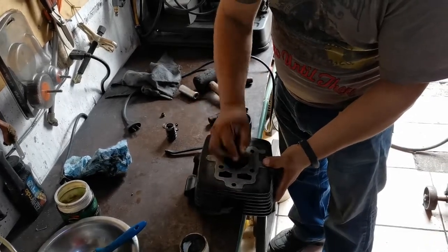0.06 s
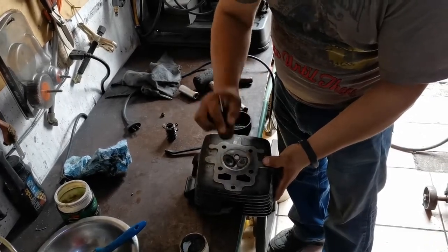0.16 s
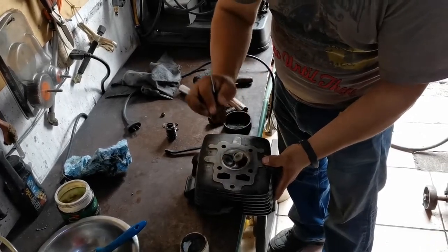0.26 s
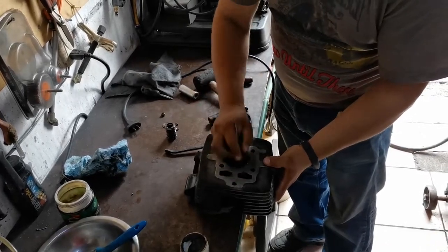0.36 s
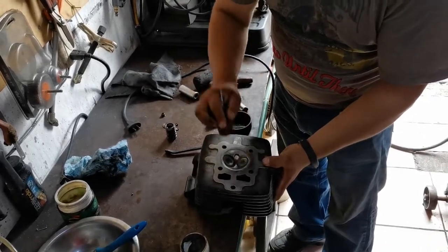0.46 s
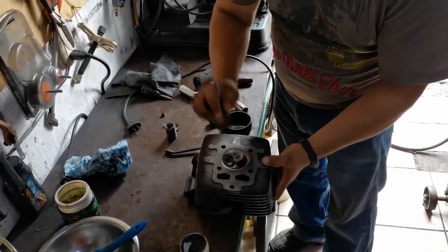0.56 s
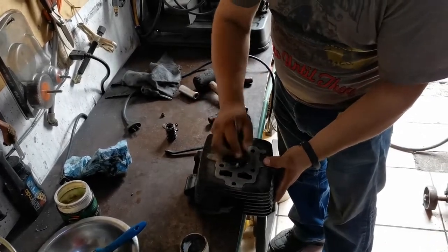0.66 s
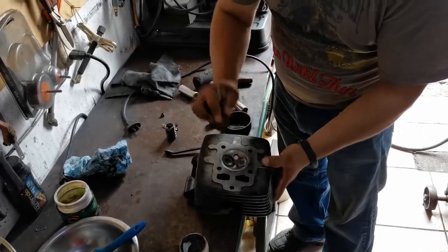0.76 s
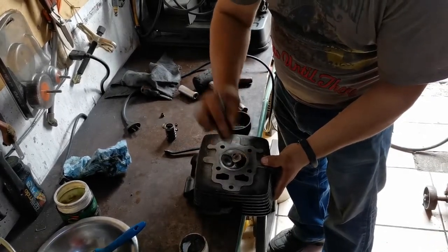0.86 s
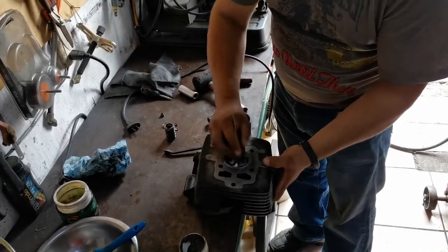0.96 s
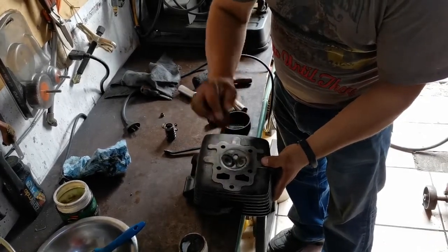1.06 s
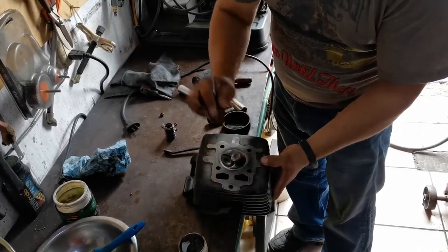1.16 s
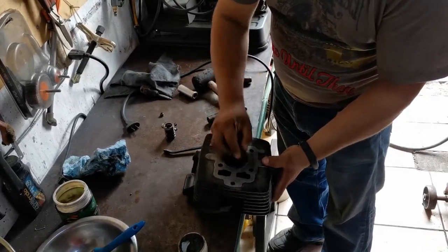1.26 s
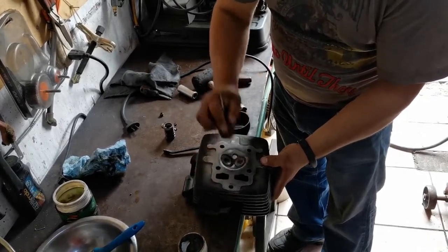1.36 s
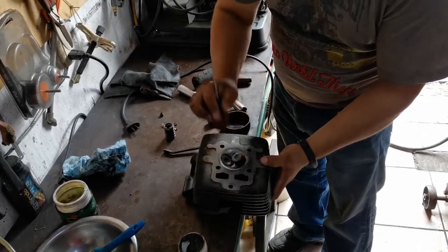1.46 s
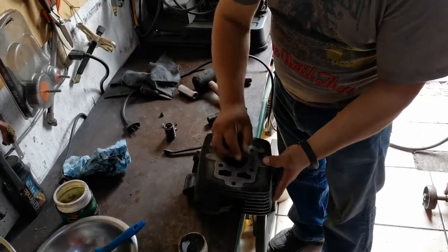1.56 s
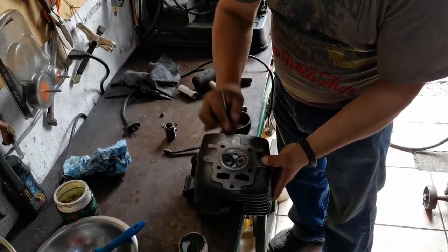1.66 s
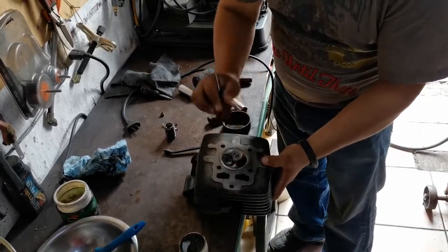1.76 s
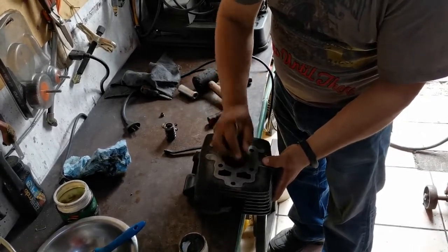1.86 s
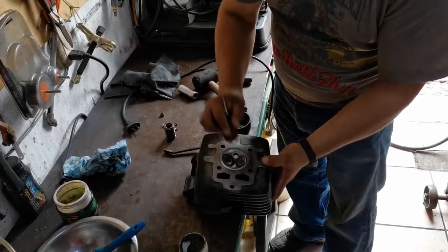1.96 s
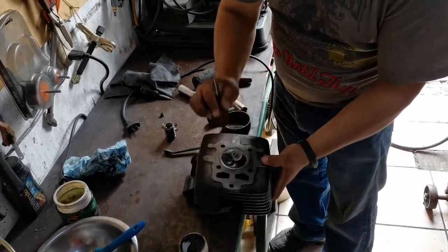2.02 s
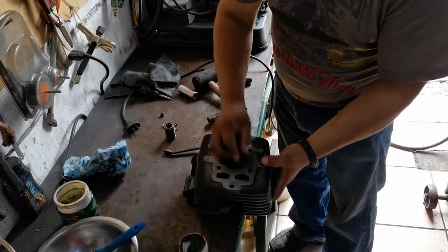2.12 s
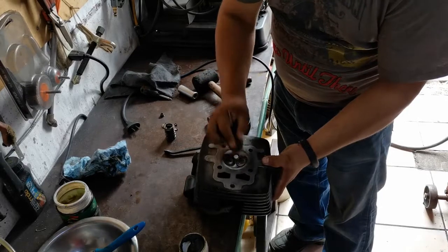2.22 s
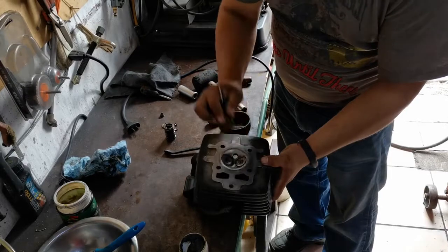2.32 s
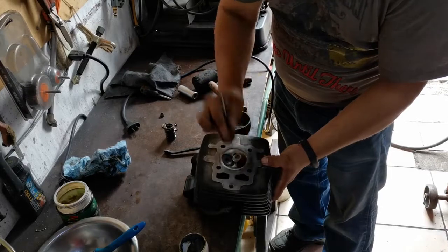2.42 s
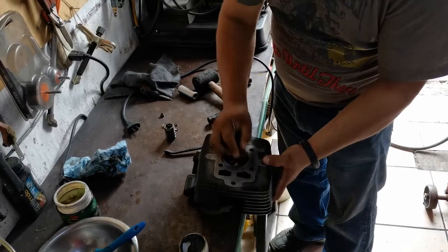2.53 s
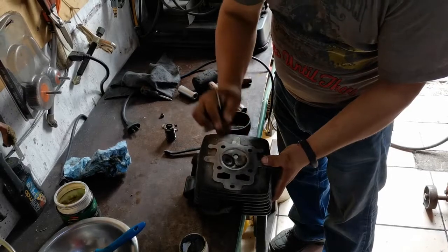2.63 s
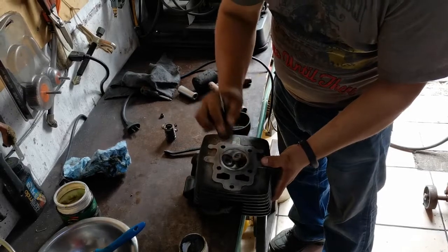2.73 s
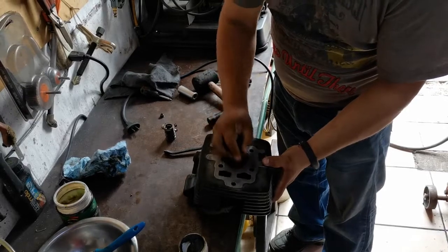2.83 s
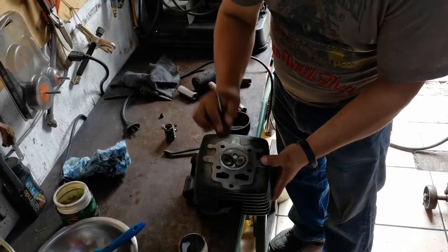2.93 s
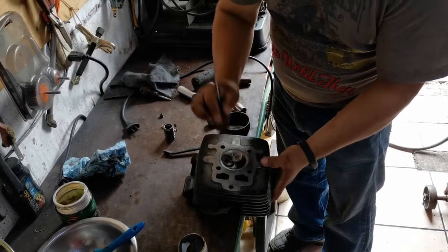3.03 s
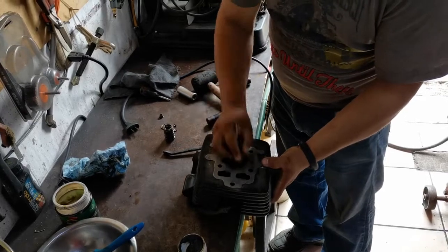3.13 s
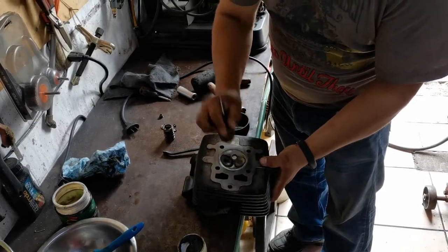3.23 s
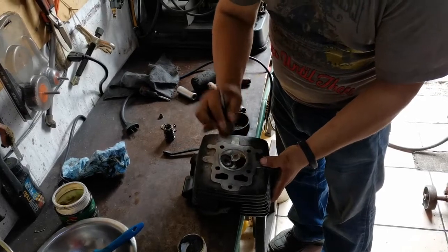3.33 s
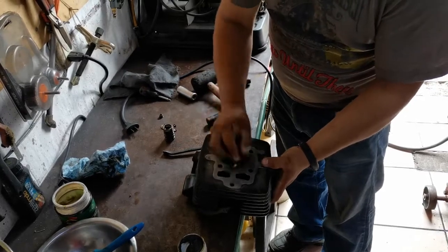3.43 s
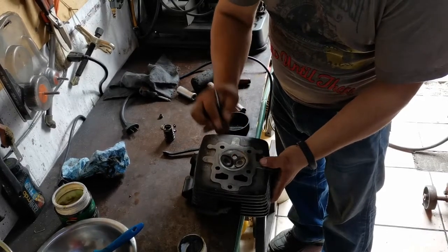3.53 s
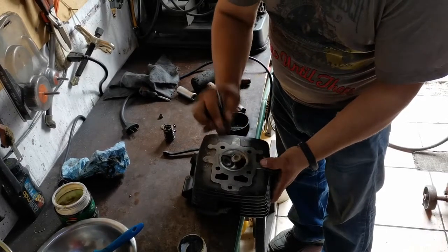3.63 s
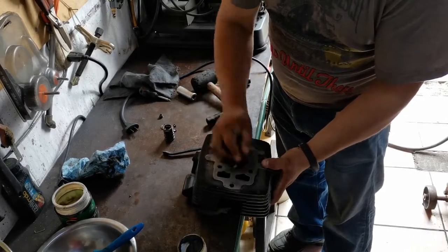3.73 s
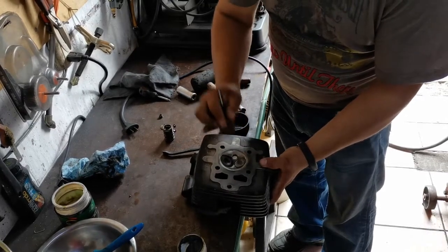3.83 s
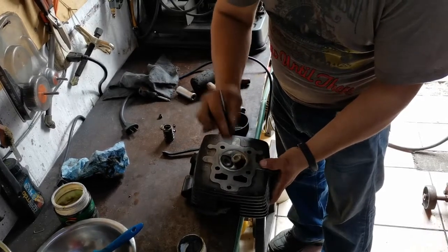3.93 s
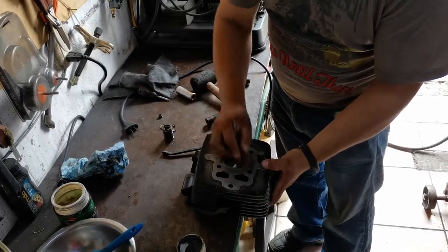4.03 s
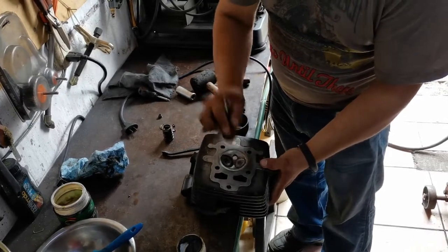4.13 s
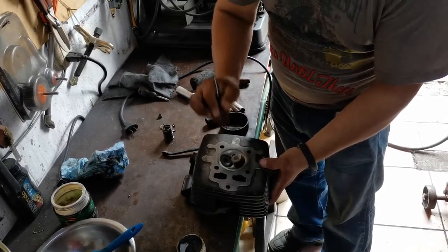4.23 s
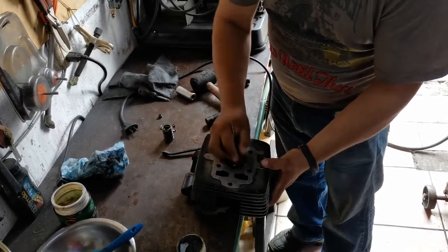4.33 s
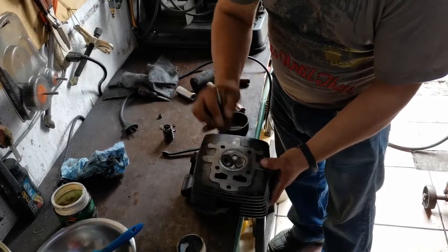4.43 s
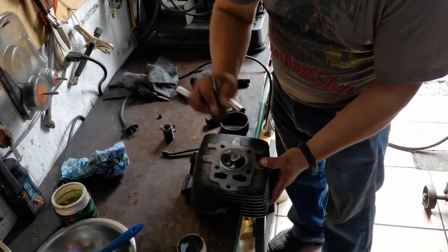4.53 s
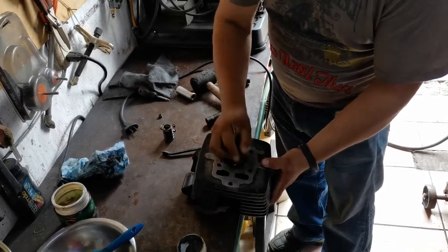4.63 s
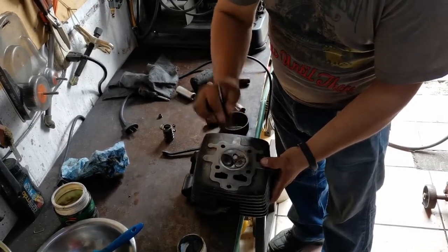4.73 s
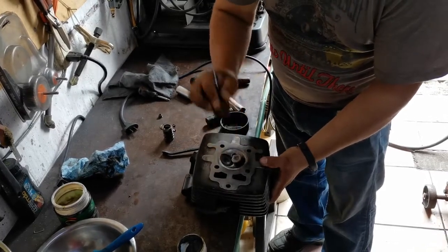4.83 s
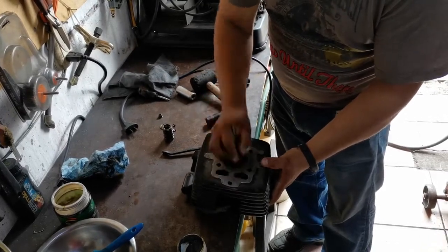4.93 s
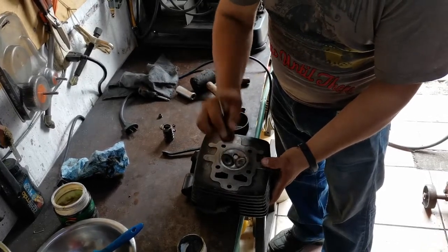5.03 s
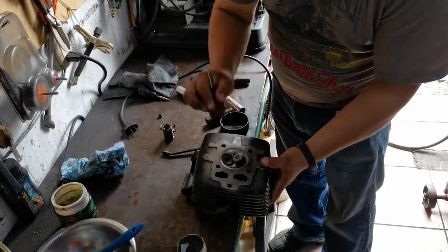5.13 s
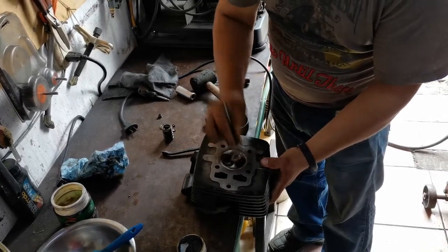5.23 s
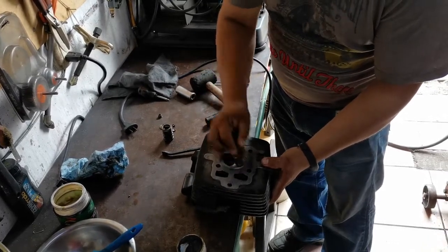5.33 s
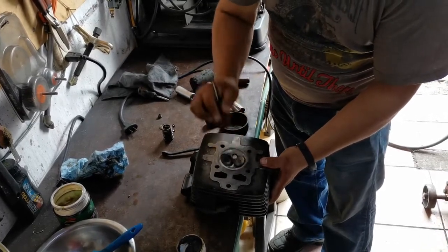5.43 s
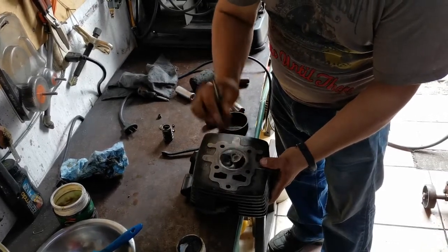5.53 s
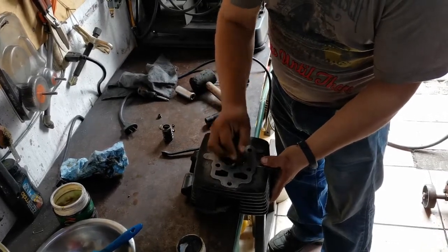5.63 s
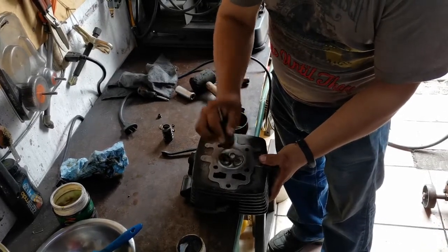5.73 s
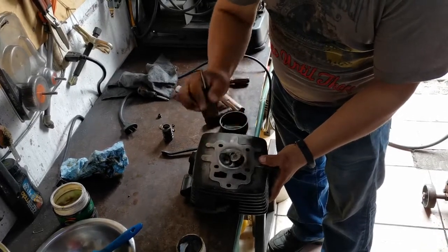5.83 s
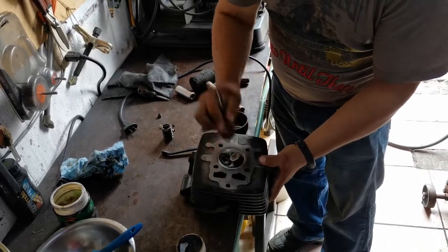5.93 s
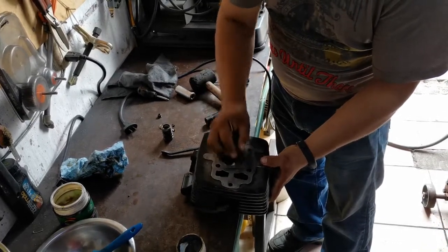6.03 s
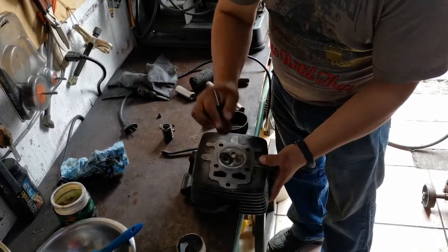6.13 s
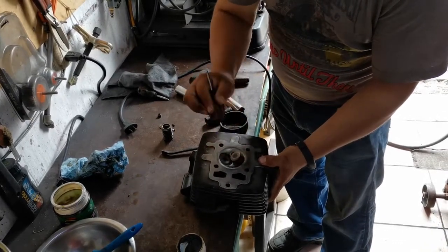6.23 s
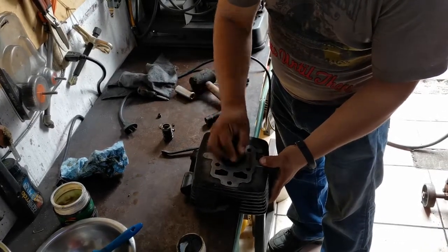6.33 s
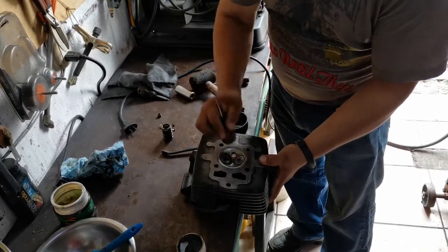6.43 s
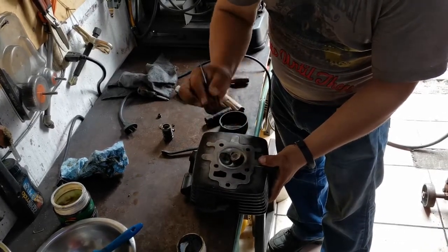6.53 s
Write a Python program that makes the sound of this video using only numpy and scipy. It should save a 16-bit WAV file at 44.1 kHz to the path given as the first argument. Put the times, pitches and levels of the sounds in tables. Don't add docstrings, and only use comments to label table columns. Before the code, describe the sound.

Quick, even metal taps with a tiny double click and short bright ring, a gritty swish between them, faint engine idle and traffic behind.

```python
import sys
import numpy as np
from scipy import signal
from scipy.fft import rfft, irfft, next_fast_len
from scipy.io import wavfile
from scipy.ndimage import uniform_filter1d, map_coordinates

SR = 44100
rng = np.random.default_rng(int(sys.argv[2]) if len(sys.argv) > 2 else 0)


def unload_wav(signal):
    wavfile.write(
        sys.argv[1],
        SR,
        np.round(np.clip(np.atleast_2d(signal).T, -1, 1) * 32767).astype(np.int16),
    )


def gain_from_decibels(decibels):
    exponent = np.asarray(decibels, float) / 20
    return 10 ** exponent


N = 289737

# t/s, port/dB, seat/dB, stem/dB, casting/dB
LANDINGS = [(0.1062, -18.5, -23, -34, -18), (0.3998, -16, -19.5, -25, -22.5),
            (0.689, -19.5, -17, -24.5, -22), (0.9779, -24.5, -29, -31, -21), (1.3114, -26, -30, -40, -29),
            (1.612, -19.5, -19.5, -28, -16), (1.9347, -16.5, -21, -33, -18),
            (2.2373, -19.5, -19, -25, -24.5), (2.5435, -22, -18.5, -30, -18),
            (2.8575, -23.5, -19, -32, -21.5), (3.1741, -24.5, -28, -28, -19.5),
            (3.4708, -21, -18, -25.5, -18.5), (3.7738, -22, -19, -23, -21.5),
            (4.0765, -16.5, -22, -25, -15.5), (4.3694, -28, -18, -31, -21),
            (4.6727, -17.5, -21.5, -24, -18.5), (4.9903, -20, -23.5, -31, -17.5),
            (5.35, -20.5, -27.5, -29, -17), (5.6829, -22.5, -28.5, -28, -19.5),
            (6.0444, -18.5, -23, -29, -11.5), (6.3929, -15, -35, -28.5, -21)]
# f/Hz, density/(dB per Hz)
LEFT_COLOUR = [(300, -13.5), (700, -19.5), (1300, -4.5), (2000, -11.5), (3500, -12), (4600, -16.5),
               (5600, -24.5), (7000, -12.5), (8500, -25), (9600, -9), (10800, 3.5), (12000, -6),
               (13300, -21), (15500, -19)]
RIGHT_COLOUR = [(300, -23.5), (700, -19), (1400, 1.5), (2800, -4), (4300, -9.5), (5000, -11.5),
                (5800, -17.5), (6900, -5), (7800, -10), (8600, -17), (9800, -27.5), (11800, -27),
                (13300, -46), (15500, -64)]
TAIL_SAMPLES = 15000
RISE_SHARP_S, LEFT_LEAD_SAMPLES = .0002, 3.5
RADIATES = signal.butter(3, [950, 14000], "bandpass", fs=SR, output="sos")


def unit(x):
    return x / np.sqrt(np.mean(x ** 2) + 1e-20)


def along(points, hz):
    f, v = np.transpose(points)
    return np.interp(np.log(hz + 1), np.log(f + 1), v)


def add(track, s, sound):
    track[:, round(s * SR):][:, :sound.shape[1]] += sound


def ports(hz):
    lean_db = along(LEFT_COLOUR, hz) - along(RIGHT_COLOUR, hz)
    return gain_from_decibels([np.minimum(lean_db, 0), np.minimum(-lean_db, 0)])


def direct(hz):
    # f/Hz, level/dB
    shade = [(600, -5), (1300, -2.5), (2200, -13), (2850, -11.5), (3450, -33), (4400, -10.5), (7700, -26)]
    return gain_from_decibels([along(shade, hz), 0 * hz])


def band(lo_hz, hi_hz):
    def gain(hz):
        edge = 1 / np.sqrt((1 + (lo_hz / (hz + 1)) ** 16) * (1 + (hz / hi_hz) ** 40))
        return edge * gain_from_decibels([along(LEFT_COLOUR, hz), along(RIGHT_COLOUR, hz)])
    return gain


def noise(n, gain):
    # f/Hz, correlation/1
    alike = [(30, .75), (90, .92), (300, .75), (700, .5), (1400, .05)]
    hz = np.fft.rfftfreq(n, 1 / SR)
    turn = np.arccos(np.clip(along(alike, hz), -1, 1)) / 2
    a, b = rfft(rng.standard_normal((2, n))) * [np.cos(turn), np.sin(turn)]
    return irfft(np.array([a + b, a - b]) * gain(hz), n)


def ripple(n, width_hz):
    knots = rng.standard_normal(int(SR / 2 / width_hz) + 4)
    return map_coordinates(knots, [np.fft.rfftfreq(n, 1 / SR) / width_hz])


def ringing(modes, t, scatter_db, phase_turns, heard, rise_s):
    hz, db, t60_s = np.transpose(modes)
    size = gain_from_decibels(db + scatter_db * rng.standard_normal(len(hz))) * heard(hz)
    turns = phase_turns * rng.standard_normal((2, len(hz))) + np.outer([LEFT_LEAD_SAMPLES, 0], hz) / SR
    waves = np.exp(np.outer(2j * np.pi * hz - np.log(1000) / t60_s, t))
    sound = ((size * np.exp(2j * np.pi * turns)) @ waves).imag * (1 - np.exp(-t / rise_s))
    return signal.sosfilt(RADIATES, sound)


def dying(t, levels_db):
    # low f/Hz, high f/Hz, rise/s, early t60/s, early level/dB, late t60/s
    bands = [(235, 1054, 0.00071, 0.11, 6.5, 0.4), (980, 2280, 0.001, 0.046, 11.5, 0.57),
             (2200, 3510, 0.00037, 0.033, 15.5, 0.56), (3640, 5350, 0.00072, 0.039, 11.5, 0.52),
             (5870, 9340, 0.002, 0.043, 14, 0.5), (9300, 13170, 0.0022, 0.051, 14.5, 0.42),
             (13800, 28000, .0005, .02, 20, .08)]
    uneven = gain_from_decibels(3 * ripple(len(t), 35) + 1.3 * ripple(len(t), 355.6))
    out = 0
    for (lo, hi, rise_s, early_s, early_db, late_s), db in zip(bands, levels_db):
        fall = gain_from_decibels(early_db - 60 * t / early_s) + gain_from_decibels(-60 * t / late_s)
        fall = fall * (1 - np.exp(-t / rise_s))
        colour = band(lo, hi)
        out = out + gain_from_decibels(db) * fall * unit(noise(len(t), lambda hz: uneven * colour(hz)))
    return out


def street():
    # t/s, traffic swell/dB, engine level/dB
    course = [(0.05, -4, -51), (0.34, 3, -35.5), (0.63, -1.5, -54.5), (0.92, -1.7, -40),
              (1.251, -1.5, -43.5), (1.56, -8, -57), (1.88, -0.5, -53), (2.18, -3, -52),
              (2.491, -3.5, -53.5), (2.801, -3.5, -62.5), (3.26, -2.5, -56.5), (3.72, 0, -55),
              (4.02, 3.5, -53.5), (4.62, 2.5, -53), (4.93, -1, -61), (5.63, -2.5, -57.5),
              (5.989, -0.5, -51), (6.57, -3, -62)]
    # f/Hz, level/dB
    whine = [(334, -66.5), (560, -70), (724, -69), (781, -66), (948, -66.5), (1114, -89), (1281, -70)]
    # t/s, length/s, f/Hz, level/dB
    beeps = [(3.857, 0.08, 535, -48.5), (4.015, 0.057, 535, -45), (4.274, 0.04, 280, -44)]
    # f/Hz, density/(dB per Hz)
    rumble_colour = [(12, -44), (25, -2), (60, -2), (110, -1.5), (160, -10), (250, -79), (500, -120)]
    traffic_colour = [(100, -17), (170, -3.5), (300, -6.5), (500, -15), (900, -12), (1500, -36),
                      (3000, -120)]
    hiss_colour = [(300, -36), (600, -10), (1000, 2.5), (2000, 3.5), (4200, -5), (6000, -14), (10800, -22),
                   (12500, -49), (14000, -120)]
    firing_hz = 84.1

    t = np.arange(N) / SR
    n = next_fast_len(N)

    def wobble(rate_hz):
        return map_coordinates(rng.standard_normal(int(N * rate_hz / SR) + 4), [t * rate_hz])

    def coloured(colour):
        return unit(noise(n, lambda hz: gain_from_decibels(along(colour, hz))))[:, :N]

    s, *columns = np.transpose(course)
    swell_db, engine_db = [np.interp(t, s, c) for c in columns]

    turn = 2 * np.pi * np.cumsum(firing_hz * (1 + 0.011 * wobble(2.3))) / SR
    first = gain_from_decibels(engine_db + 0) * gain_from_decibels(wobble(10)) * np.sin(turn)
    second = gain_from_decibels(-56) * gain_from_decibels(4 * wobble(18)) * np.sin(2 * turn + .8 * wobble(18))
    out = np.sqrt(2) * (first + second)
    for hz, db in whine:
        out = out + gain_from_decibels(db + 3.3 * wobble(7.4)) * np.sin(2 * np.pi * hz * t + 1.3 * wobble(7.2))
    for at, length_s, hz, db in beeps:
        swell = np.sin(np.pi * np.clip((t - at) / length_s, 0, 1))
        out = out + gain_from_decibels(db) * swell * np.sin(2 * np.pi * hz * t)

    rumble = gain_from_decibels(-47.5 + swell_db)
    traffic = gain_from_decibels(-57.5 + 0.59 * swell_db + 1.13 * t)
    out = out + rumble * gain_from_decibels(3.04 * wobble(17)) * coloured(rumble_colour)
    out = out + traffic * gain_from_decibels(wobble(16)) * coloured(traffic_colour)
    hiss = unit(noise(n, lambda hz: gain_from_decibels(along(hiss_colour, hz)) * ports(hz)))[:, :N]
    return out + gain_from_decibels(-57.0) * hiss


def ticks(track):
    # t/s, tick level/dB, valve level/dB
    contacts = [(0.0998, -20, -19), (0.3931, -22, -20), (0.6822, -19, -20), (0.9712, -19, -23),
                (1.3027, -18, -20), (1.6052, -16, -21), (1.9285, -24, -27), (2.2293, -16, -26),
                (2.5364, -20, -28), (2.849, -19, -22), (3.1683, -24, -26), (3.4633, -14, -24),
                (3.767, -16, -31), (4.0695, -18, -25), (4.3622, -19, -19), (4.6651, -16, -28),
                (4.984, -16, -28), (5.3422, -15, -25), (5.6766, -18, -29), (6.0398, -21, -23),
                (6.387, -17, -29)]
    # f/Hz, level/dB, t60/s
    port_modes = [(2800, 0, .03), (2450, -8, .01), (3500, -9, .004), (8200, -12, .006)]
    t = np.arange(4000) / SR
    near = t[:1000]
    shut = .1 + .9 / (1 + np.exp(np.clip((near - .0026) / .00015, -50, 50)))
    for s, db, sing_db in contacts:
        port = ringing(port_modes, near, 1.5, .03, direct, RISE_SHARP_S)
        add(track, s, gain_from_decibels(db + 4) * shut * port)
        levels_db = [db - 40, db - 27, db - 25, db - 27, db - 28, sing_db - 11, sing_db - 34]
        add(track, s, gain_from_decibels(-60 * t / .08) * dying(t, levels_db))


def blows(track):
    # f/Hz, level/dB, t60/s
    part_modes = [
        [(2700, 2, 0.013), (2097, -3, 0.017), (3640, -10, 0.027), (3210, -4, 0.0082)],
        [(4377, 1.5, 0.025), (5100, 9, 0.0018)],
        [(7730, 1.5, 0.026), (7540, 0, 0.012)],
        [(1260, -37, 0.06), (1360, -12, 0.038), (1468, 1.5, 0.01), (1604, -4.5, 0.0037), (1880, -15, 0.0078)],
    ]
    # t/s, level/dB
    thumps = [(4.0769, -2.5), (6.3934, -18)]
    t = np.arange(3000) / SR
    u = t / 0.0002
    push = (u * (1 - u / 3.5) * np.exp(-u))[None]
    for s, *parts_db in LANDINGS:
        modes = []
        for part, part_db in zip(part_modes, parts_db):
            modes += [(hz, db + part_db + 6.5, t60_s) for hz, db, t60_s in part]
        add(track, s, ringing(modes, t, 1.2, .02, direct, RISE_SHARP_S))
        add(track, s, gain_from_decibels(-24) * push)
    for s, db in thumps:
        add(track, s, gain_from_decibels(db) * push)


def tails(track):
    # f/Hz, level/dB re wash, t60/s
    weak_modes = [(1415, -6, .3), (1631, -6, .3), (1717, -7, .3), (2007, -6, .3), (2690, -9, .35),
                  (2848, -9, .35), (3181, -9, .3), (4834, -12, .3), (5609, -21, .2), (7832, -16, .3),
                  (8893, -24, .25),
                  (9910, -12, .35), (10007, -11, .35), (10292, -7, .35), (10621, -7, .35), (10933, -5, .35),
            (11090, -5, .35), (11423, -7, .35), (11545, -9, .35), (11730, -11, .35), (12290, -10, .3),
            (12758, -22, .3)]
    # f/Hz, usual level/dB, t60/s
    clear = [(1280, -60, .5), (3380, -57, .7), (4362, -56, .6), (6860, -63, .5), (10740, -60, .45)]
    # landing t/s, f/Hz, level/dB
    singing = [(0.107, 10740, -41), (1.612, 4362, -54), (0.4, 6860, -45), (0.978, 1280, -42.5),
               (0.978, 6860, -46), (3.775, 4362, -51), (1.935, 3380, -49), (2.238, 3380, -56),
               (2.544, 10740, -51), (2.858, 1280, -47.5), (3.175, 3380, -42), (3.175, 10740, -48),
               (3.471, 1280, -46.5), (3.471, 10740, -38), (3.775, 3380, -59), (3.775, 6860, -43),
               (4.077, 1280, -42), (3.471, 4362, -50), (4.37, 10740, -38), (4.673, 6860, -47.5),
               (4.991, 1280, -43.5), (4.991, 6860, -52), (5.35, 10740, -29.5), (5.683, 10740, -39),
               (6.044, 1280, -35.5), (6.393, 3380, -62), (2.544, 4362, -49), (4.991, 4362, -47),
               (5.35, 4362, -54), (5.683, 4362, -50)]
    usual_knock_db = [-20, -23, -29, -19]
    # ordinary level/dB, gain/(dB per dB of knock)
    stirs = [(-42.5, 0.7), (-45.5, 0.82), (-49, 0.25), (-41, 0.78)]
    valve_db = -38
    t = np.arange(TAIL_SAMPLES) / SR

    def clear_db(s, hz, usual_db):
        caught = [d for at, f, d in singing if abs(at - s) < .1 and abs(f / hz - 1) < .15]
        return max([usual_db] + caught)

    for s, *knock_db in LANDINGS:
        wash_db = [db + gain * (k - usual) for (db, gain), k, usual in zip(stirs, knock_db, usual_knock_db)]
        port, seat, stem, casting = wash_db
        top_db = valve_db - 30 + 5 * rng.standard_normal()
        levels_db = np.array([casting - 18, casting, port, seat, stem, valve_db, top_db])
        add(track, s, dying(t, levels_db + 4))

        stirred = [(1500, casting), (2900, port), (4600, seat + 5), (10500, valve_db)]
        modes = [(hz, db + along(stirred, hz) + 5, t60_s) for hz, db, t60_s in weak_modes]
        add(track, s, ringing(modes, t[:11000], 4, .5, ports, .002))

        modes = [(hz, clear_db(s, hz, db) + 4.0, t60_s) for hz, db, t60_s in clear]
        add(track, s, ringing(modes, t, 0, 0.555, ports, 0.0012))


def lifts(track):
    # t/s, peak level/dB
    pulls = [(0.278, -52), (0.569, -49), (0.8594, -49), (1.17, -52), (1.4894, -50.5), (1.7894, -51),
             (2.109, -52), (2.42, -58), (2.719, -52), (3.022, -44.5), (3.298, -49), (3.6484, -47.5),
             (3.949, -45.5), (4.2575, -46.5), (4.5564, -46.5), (4.867, -50), (5.197, -43.5), (5.3054, -68),
             (5.596, -56), (5.6434, -46.5), (5.889, -56), (6.2494, -57), (6.3619, -51.5)]
    t = np.arange(5000) / SR
    swell = t / 0.0053 * np.exp(1 - t / 0.0061) + 1.55 * gain_from_decibels(-60 * t / 0.27)
    for s, db in pulls:
        grit = unit(noise(len(t), band(6500, 13000)))
        stem = ringing([(7620, 4, .15)], t, 3, 0.74, ports, 0.002)
        add(track, s, gain_from_decibels(db - 13.5) * swell * (grit + stem))


def ducking(taps, knee_db=-54, slope=0.85, lag_s=0.059):
    power = uniform_filter1d(np.mean(taps ** 2, axis=0), size=441)
    level_db = 10 * np.log10(np.abs(power) + 1e-12)
    cut_db = slope * np.maximum(level_db - knee_db, 0)
    keep = np.exp(-1 / (lag_s * SR))
    return gain_from_decibels(-signal.lfilter([1 - keep], [1, -keep], cut_db))


def scene():
    track = np.zeros((2, N + TAIL_SAMPLES))
    for source in (ticks, blows, tails, lifts):
        source(track)
    t = np.arange(TAIL_SAMPLES) / SR + 0.15
    add(track, 0, dying(t, [-56, -46, -60, -38.5, -49, -38, -60]))
    taps = track[:, :N]
    return taps + ducking(taps) * street()


def top_cut(x):
    return signal.sosfilt(signal.butter(12, 16400, fs=SR, output="sos"), x)


def record(dry):
    rounded = dry / (1 + np.abs(dry / .97) ** 6) ** (1 / 6)
    lowpass = signal.cheby1(10, .5, 15900, fs=SR, output="sos")
    mix = signal.sosfilt(lowpass, rounded)
    return top_cut(mix)


dry = scene()
out = record(dry)
unload_wav(out)
```